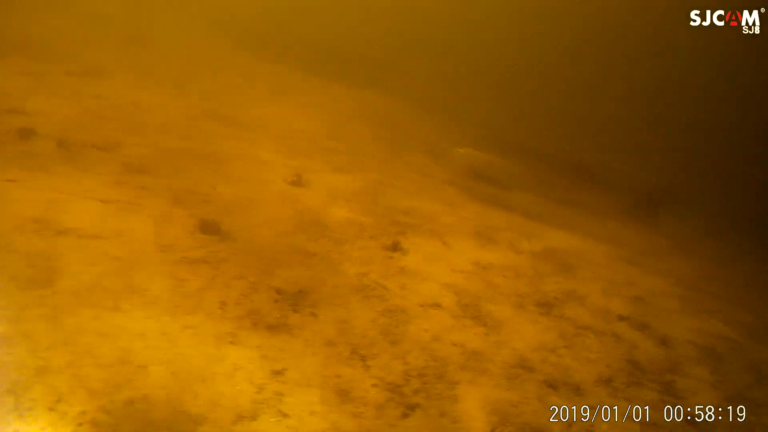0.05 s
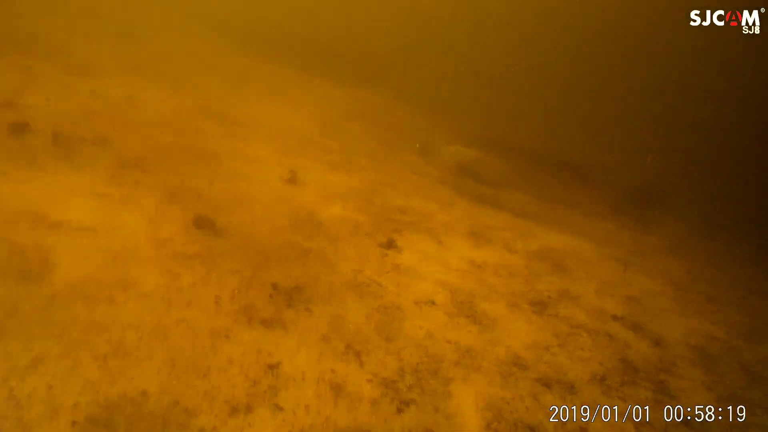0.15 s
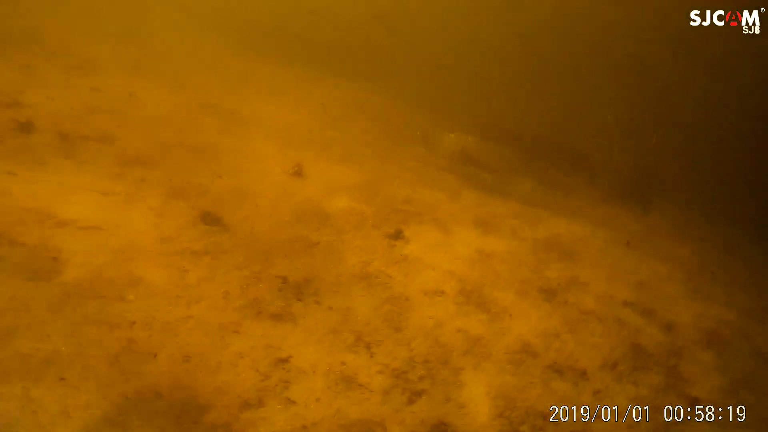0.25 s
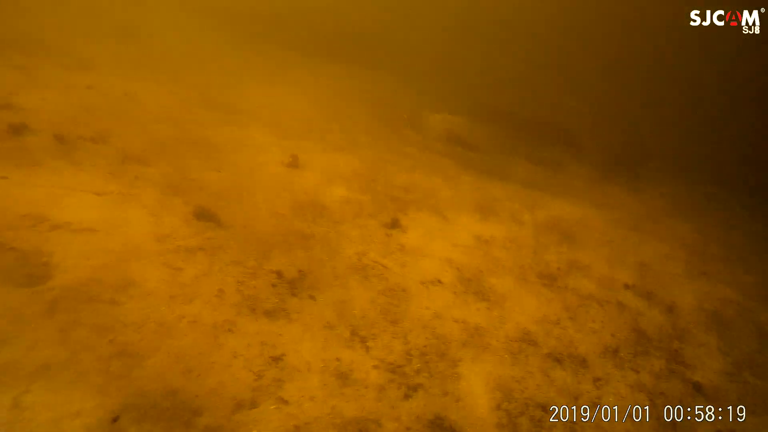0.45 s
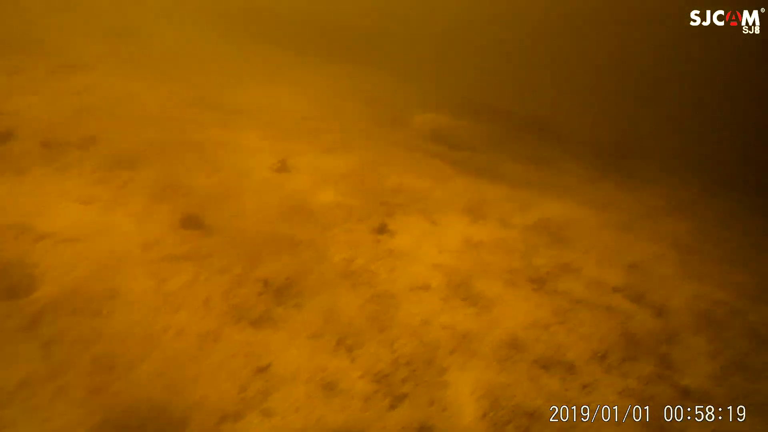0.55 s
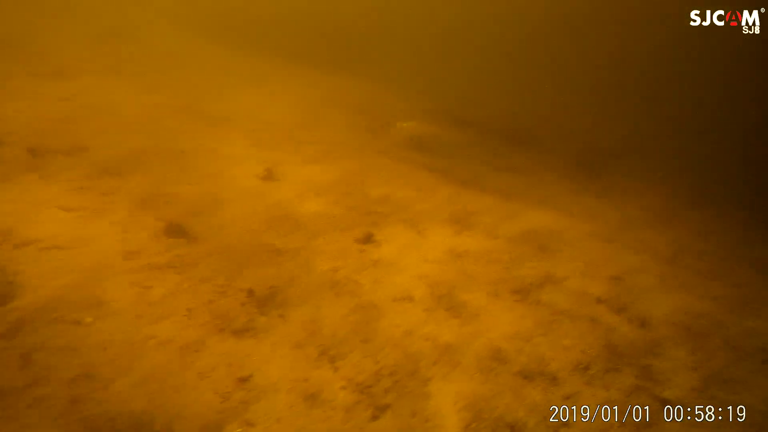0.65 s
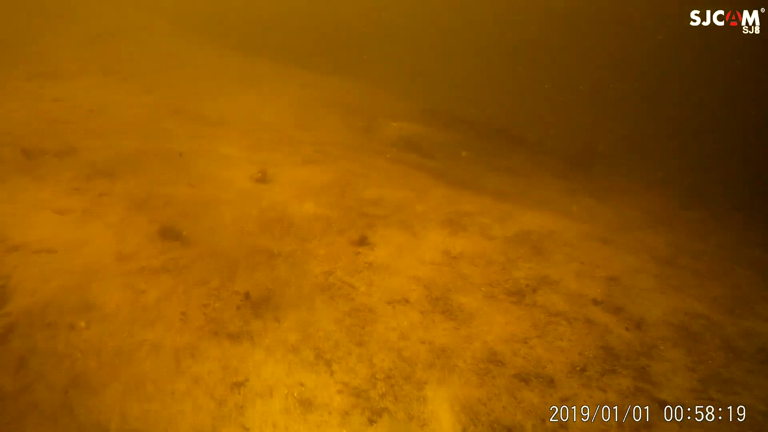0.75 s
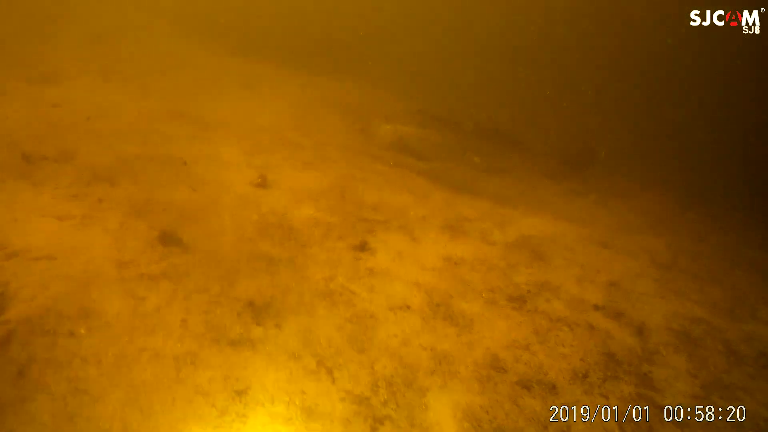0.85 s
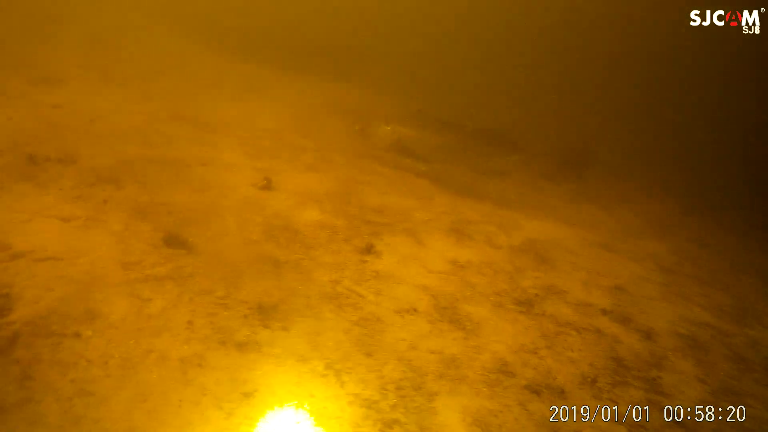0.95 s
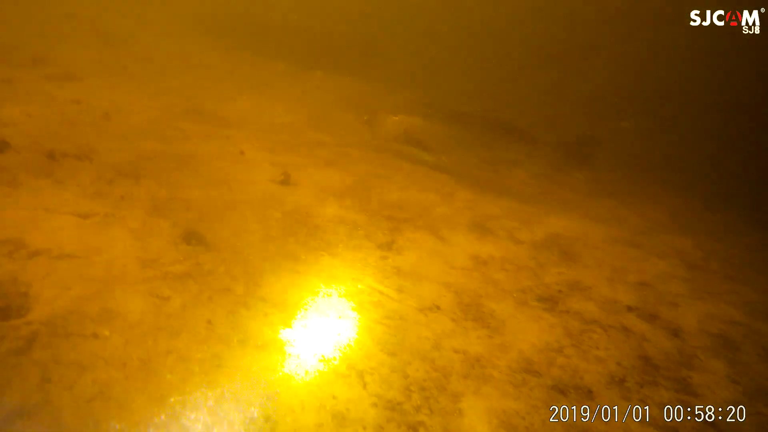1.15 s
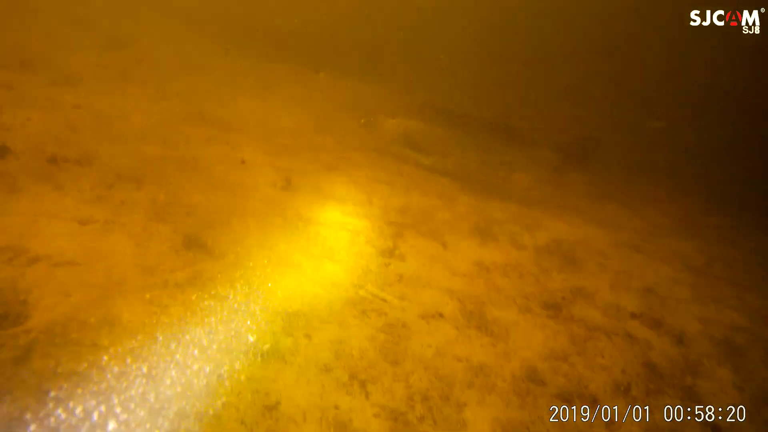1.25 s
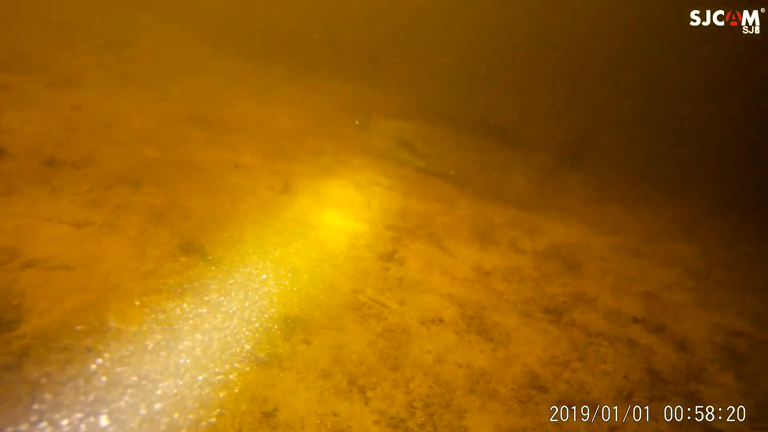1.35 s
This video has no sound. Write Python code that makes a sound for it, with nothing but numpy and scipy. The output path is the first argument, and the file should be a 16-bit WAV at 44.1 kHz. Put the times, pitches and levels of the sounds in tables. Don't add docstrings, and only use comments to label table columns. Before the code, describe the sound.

A hard, dry knock hits a sealed plastic case almost at once, overloading the microphones inside and dying instantly. Around it lie faint muffled water rumble and hiss; quiet bubbles tick and gurgle increasingly toward the end.

```python
import sys
import numpy as np
from scipy import signal
from scipy.io import wavfile
from scipy.ndimage import uniform_filter1d

SR = 44100
rng = np.random.default_rng(int(sys.argv[2]) if len(sys.argv) > 2 else 0)


def field_ratio(decibels):
    return 10 ** (np.asarray(decibels, dtype=float) / 20)


def dump(signal):
    limited = np.clip(np.atleast_2d(signal).T, -1, 1)
    pcm = np.round(limited * 32767).astype(np.int16)
    wavfile.write(sys.argv[1], SR, pcm)


N = 61739

# frequency in Hz, level in dB per Hz.
HISS_SPECTRUM = [(300, 3), (1400, 0), (2900, -.5), (4500, -3), (7000, -6), (11000, -4.5), (15500, -9)]
HISS_DB, HISS_ALIKE = -59, 0.085
WHINE_HZ, WHINE_WANDER_HZ, WHINE_DB = 11057, 25, -72

# frequency in Hz, level in dB per Hz.
RUMBLE_SPECTRUM = [(30, 10), (60, -6), (90, -8), (135, -7)]
# time in seconds, level in dB.
RUMBLE_LEVEL = [(0.0, -51.5), (0.19, -47.5), (0.338, -53.5), (0.568, -51), (0.946, -58.5), (1.4, -42)]
RUMBLE_DB = -2

# frequency in Hz, level in dB per Hz.
WATER_SPECTRUM = [(18, 9), (45, -5.5), (80, -9.5), (150, -6), (290, -10), (690, -7.5), (1050, -10),
                  (1300, -19.5)]
# time in seconds, level in dB.
STIR = [(0.0, -49), (0.08, -53.5), (0.506, -56), (0.836, -51.5), (0.98, -52.5), (1.4, -54)]
WATER_DB, WATER_CUT_HZ, WATER_ALIKE = 3.0, 1010, 1
SHELL_RIGHT_DB = -3.5

# start in seconds, level in dB, pitch in Hz, left over right in dB.
TICKS = [(0.183, -49, 3000, -32), (.273, -66, 8300, -2), (0.506, -41, 2410, -15), (0.506, -39, 8100, -19),
         (.539, -41.5, 1860, -9), (0.707, -48, 5200, 16), (0.788, -40.5, 2960, -9), (.84, -45.5, 2530, -2),
         (.961, -37, 2510, 0.1), (1.039, -41, 4060, 12), (1.064, -50.5, 2300, 7), (1.07, -43.5, 5100, 9),
         (1.083, -35.5, 12100, 10), (1.204, -42, 2780, -4), (1.272, -38, 4830, 14.5),
         (1.332, -44.5, 3560, -2), (1.338, -43.5, 1695, -1)]
TICK_CYCLES, TICK_RISE = 23.7, -0.036

# start in seconds, level in dB, pitch in Hz, length in cycles.
GURGLES = [(.181, -30, 740, 7.7), (.21, -40.5, 689, 41), (.70, -42, 665, 26), (0.716, -37, 415, 16),
           (0.814, -46, 1046, 45), (0.883, -38.5, 400, 23.4), (0.883, -45, 873, 48),
           (0.929, -46.5, 142, 25.5), (.99, -44.5, 690, 34), (1.07, -44.5, 849, 49), (1.137, -31, 216, 3.8),
           (1.179, -41, 232, 24), (1.234, -35, 330, 8.4), (1.305, -28.5, 177, 4.6), (1.31, -39, 515, 7),
           (1.372, -23, 255, 3.7), (1.374, -32.5, 834, 31)]
GURGLE_RISE = 0.15

# start in seconds, level in dB, length in seconds, top in Hz.
SCUFFS = [(.0, -61.5, 0.045, 3400), (0.141, -59.5, 0.12, 3330), (0.171, -46.5, 0.046, 1500),
          (0.174, -42, 0.028, 344), (.503, -58, 0.0091, 8700), (.512, -58.5, 0.057, 3380),
          (0.627, -54, 0.033, 833), (0.692, -54, 0.076, 1111), (0.706, -68.5, 0.033, 5670),
          (0.886, -49.5, 0.023, 1140), (1.246, -63, 0.039, 5700), (1.368, -45, 0.034, 420),
          (1.289, -49, 0.073, 844), (1.378, -54, 0.09, 3060)]
SCUFF_SPAN = 4.0
GRAINS_PER_S, GRAIN_SPREAD_DB = 7200, 2

# start in seconds, level in dB, length in seconds.
NUDGES = [
    (.001, -32.5, 0.0091),
    (.10, -58, 0.018),
    (.183, -34.5, 0.0082),
    (.37, -35.5, 0.008),
    (.495, -31, .02),
    (.56, -76, 0.013),
    (.63, -37.5, 0.037),
    (.735, -40.5, 0.0067),
    (.805, -70, .02),
]
ROCK_HZ, ROCK_T60_S = 87, 0.1

# start in seconds, level in dB, contact softness in Hz, direction and share.
KNOCK = [
    (0.2465, 8.55, 5300, -0.58),
    (0.248, 1.5, 1500, 0.5),
]
# frequency in Hz, level in dB, time to fall 60 dB in seconds.
CASE = [(97.4, -8, 0.12), (250.4, -11, 0.041), (332, -8, 0.027), (459, -7, 0.028), (511, -17, .07),
        (591, -43.5, 0.032), (772, 5.5, 0.011), (907, -9.5, 0.0087), (1500, 6, 0.0048)]
KNOCK_DB, KNOCK_RIGHT_DB = -2.5, -3.5
# frequency in Hz, left level in dB, right level in dB,
# time to fall 60 dB in seconds.
CRACK = [(2110, -33.5, -20.5, 0.008), (3120, -27, -27.5, 0.00727), (4290, -10.5, -7, 0.006),
         (5200, -17.5, 0, 0.0029), (6060, -30.5, -22.5, 0.0023), (6650, -15.5, -19, 0.0038),
         (8100, -33.5, -29, 0.0027)]
CRACK_S, CRACK_LEAD_S = 0.2462, 0.000085

# start in seconds, length in seconds.
STARVED = [
    (.226, .026),
    (.484, .024),
]
STARVED_HZ = 8800
COUPLING_HZ, OVERSHOOT_DB = 39.4, 0.5


def rms_one(x):
    return x / np.sqrt(np.mean(x ** 2) + 1e-20)


def drift(rate):
    step = 40
    r = np.exp(-2 * np.pi * step * rate / SR)
    noise = rng.standard_normal(N // step + 2002)
    slow = signal.lfilter([1], [1, -2 * r, r * r], noise)[2000:]
    return np.interp(np.arange(N) / step, np.arange(len(slow)), rms_one(slow))


def since(s):
    return np.maximum(np.arange(N) / SR - s, 0)


def ring(s, hz, t60, rise=0):
    u = since(s)
    glide = 1 + 0.5 * rise * np.minimum(u / t60, 1)
    return np.sin(2 * np.pi * hz * u * glide) * field_ratio(-60 * u / t60)


def soften(x, hz):
    r = np.exp(-2 * np.pi * hz / SR)
    return signal.lfilter([1 - r], [1, -r], x + 1e-18)


def band_pass(x, order, low, high):
    return signal.sosfilt(signal.butter(order, [low, high], "band", fs=SR, output="sos"), x)


def banded_noise(spectrum, alike, patchy_db, rate):
    hz_at, db_at = np.transpose(spectrum)
    out, together, alike = 0, drift(rate / 3), np.clip(alike, 0, 1)
    octaves = np.log2(hz_at[-1] / hz_at[0])
    edges = hz_at[0] * 2 ** np.arange(0, octaves + 0.3, 1 / 3)
    white = rng.standard_normal((2, 2, N + 8000))
    for k, (low, high) in enumerate(zip(edges, edges[1:])):
        mid, side = band_pass(white[k % 2], 2, low, high)[:, 8000:]
        level_db = np.interp(np.log(low * high) / 2, np.log(hz_at), db_at)
        gain = field_ratio(level_db + patchy_db * (0.5 * together + drift(rate)))
        out = out + gain * (np.sqrt(1 + alike) * mid + np.sqrt(1 - alike) * side * [[1], [-1]])
    return rms_one(out)


def preamp():
    hiss = banded_noise(HISS_SPECTRUM, HISS_ALIKE, patchy_db=1.4, rate=23)
    pitch = WHINE_HZ + WHINE_WANDER_HZ * drift(66)
    whine = np.sin(2 * np.pi * np.cumsum(pitch) / SR) * field_ratio(2.0 * drift(17))
    return field_ratio(HISS_DB) * hiss + field_ratio(WHINE_DB) * whine


def rumble():
    s, db = np.transpose(RUMBLE_LEVEL)
    lumps = banded_noise(RUMBLE_SPECTRUM, WATER_ALIKE, patchy_db=6.5, rate=2.67)
    return field_ratio(RUMBLE_DB + np.interp(np.arange(N) / SR, s, db)) * lumps


def water():
    s, db = np.transpose(STIR)
    murmur = banded_noise(WATER_SPECTRUM, WATER_ALIKE, patchy_db=2.5, rate=8.7)
    murmur = signal.sosfilt(signal.butter(6, WATER_CUT_HZ, fs=SR, output="sos"), murmur)
    return field_ratio(WATER_DB + np.interp(np.arange(N) / SR, s, db)) * murmur


def bubble_ticks():
    out = 0
    for s, db, hz, pan in TICKS:
        fade_in = np.minimum(since(s) * hz / 3, 1)
        sides = field_ratio(db + pan * np.array([[0.5], [-0.5]]))
        out = out + sides * ring(s, hz, TICK_CYCLES / hz, TICK_RISE) * fade_in
    return out


def bubble_gurgles():
    out = 0
    for s, db, hz, cycles in GURGLES:
        fade_in = np.minimum(since(s) * hz / 1.38, 1)
        out = out + field_ratio(db) * ring(s, hz, 2 * cycles / hz, GURGLE_RISE) * fade_in
    return out


def scuffs():
    hits = rng.random(N) < GRAINS_PER_S / SR
    sizes = field_ratio(GRAIN_SPREAD_DB * np.minimum(rng.exponential(1, N), 3))
    grains = hits * sizes * rng.choice([-1, 1], N)
    out = 0
    for s, db, length, top_hz in SCUFFS:
        rub = rms_one(band_pass(grains + 1e-18, 4, top_hz / SCUFF_SPAN, top_hz))
        hump = np.sqrt(np.abs(np.sin(np.pi * np.minimum(since(s) / length, 1))))
        out = out + field_ratio(db) * rub * hump * (since(s) < length)
    return out


def nudges():
    shove = 0
    for s, db, length in NUDGES:
        push = np.sin(np.pi * np.minimum(since(s) / length, 1))
        shove = shove - field_ratio(db) * push * np.sin(2 * np.pi * ROCK_HZ * since(s)) / length
    r = field_ratio(-60 / (ROCK_T60_S * SR))
    w = 2 * np.pi * ROCK_HZ / SR
    return signal.lfilter([0, 2.78 * np.sin(w) / SR], [1, -2 * r * np.cos(w), r * r], shove + 1e-18)


def case_knock():
    body = 0
    for s, hit_db, soft_hz, way in KNOCK:
        ringing = sum(field_ratio(db) * ring(s, hz, t60) for hz, db, t60 in CASE)
        body = body + way * field_ratio(hit_db) * soften(ringing, soft_hz)
    return field_ratio(KNOCK_DB) * body * field_ratio(np.array([[0], [KNOCK_RIGHT_DB]]))


def port_crack():
    out = 0
    for hz, left_db, right_db, t60 in CRACK:
        left = field_ratio(left_db) * ring(CRACK_S + CRACK_LEAD_S, hz, t60)
        right = field_ratio(right_db) * ring(CRACK_S, hz, t60)
        out = out + np.array([left, right])
    return out


def scene():
    shell = rumble() + water() + bubble_gurgles() + scuffs() + nudges()
    shell = shell * field_ratio(SHELL_RIGHT_DB * np.array([[-0.5], [0.5]]))
    return preamp() + shell + bubble_ticks() + case_knock() + port_crack()


def band_limit(x):
    return signal.sosfilt(signal.butter(12, 15630, fs=SR, output="sos"), x)


def record(dry):
    loud = np.clip(dry, -1, 1)
    loud = signal.lfilter(*signal.butter(1, COUPLING_HZ, "high", fs=SR), loud)
    low_pass = signal.ellip(8, 0.3, 45, STARVED_HZ, fs=SR, output="sos")
    dull = signal.sosfiltfilt(low_pass, loud)
    starved = sum(1.0 * (since(s) > 0) * (since(s) < length) for s, length in STARVED)
    starved = uniform_filter1d(starved, size=90)
    mix = loud + starved * (dull - loud)
    return band_limit(np.clip(field_ratio(OVERSHOOT_DB) * mix, -1, 1))


dry = scene()
out = record(dry)
dump(out)
```